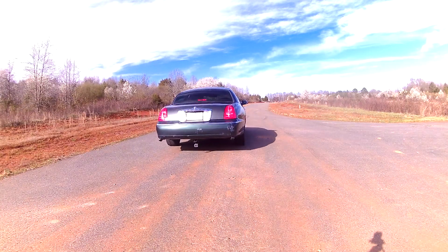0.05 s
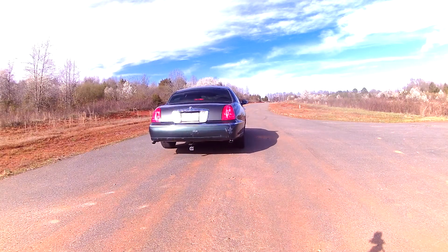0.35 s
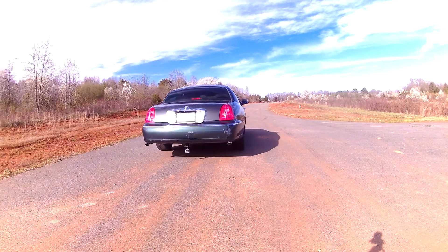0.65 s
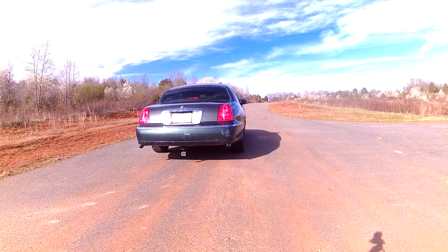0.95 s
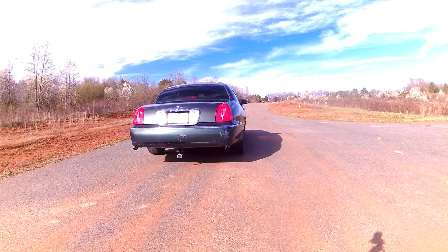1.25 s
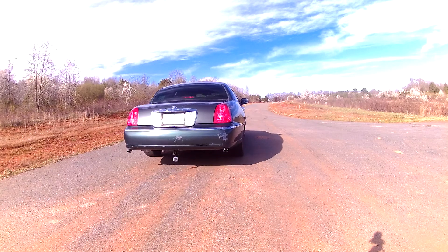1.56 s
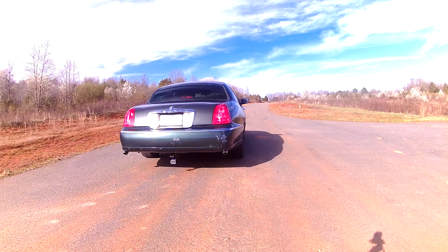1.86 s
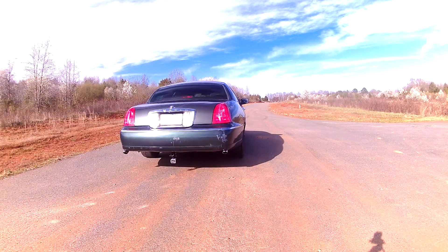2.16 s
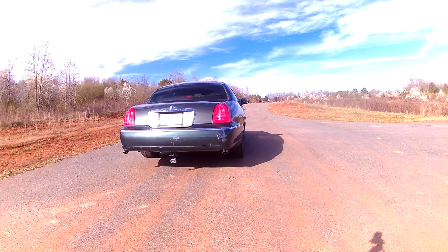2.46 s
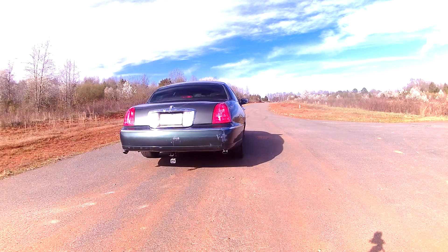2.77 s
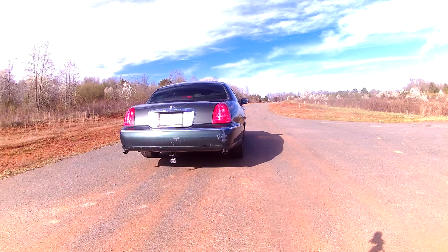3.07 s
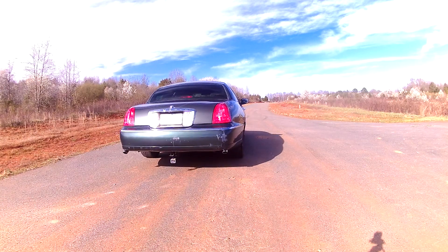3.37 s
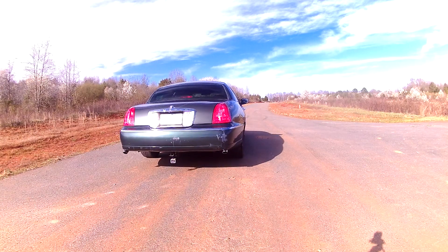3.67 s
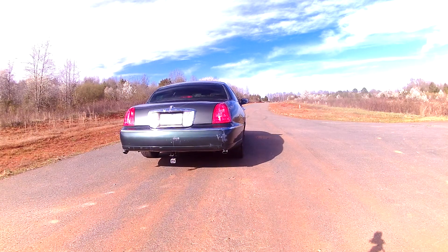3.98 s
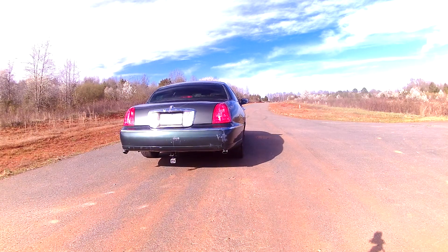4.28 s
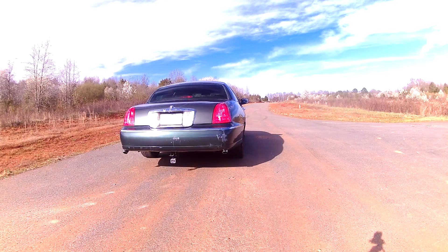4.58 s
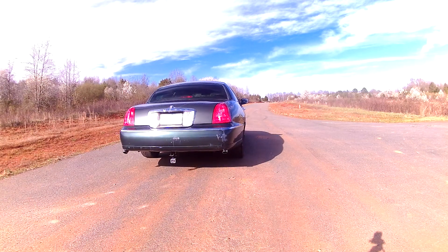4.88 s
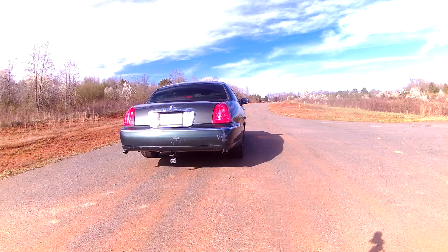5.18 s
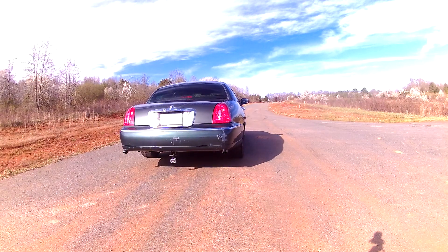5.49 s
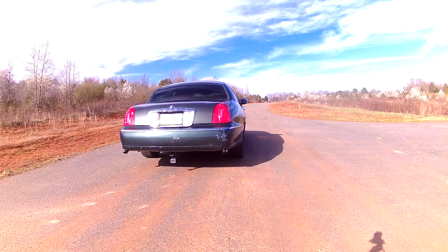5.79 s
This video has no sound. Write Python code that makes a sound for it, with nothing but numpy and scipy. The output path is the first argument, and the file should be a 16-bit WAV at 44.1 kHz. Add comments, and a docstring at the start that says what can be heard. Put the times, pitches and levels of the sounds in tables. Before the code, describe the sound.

A large V8 car reverses slowly toward the microphone on an open road, its tyres rustling and cracking a few small stones, with one brief squeak and a faint gear whine. It stops and idles with a deep, loping exhaust and light valve ticking. The gear selector clunks through its notches, the revs sag, and the driveline knocks once. A faint hiss sits underneath.

```python
"""V8 saloon reversing to a stop

A big V8 backs slowly up on an open road, tyres cracking grit, then idles; unequal exhaust pulses make it lope.
Valves tick, a gear whines faintly, a rub squeaks once. The selector clunks through its notches, the revs
sag as drive takes up, and the driveline knocks once. The camera adds hiss and a thin electric whistle."""
import sys
import numpy as np
from scipy import signal
from scipy.fft import rfft, irfft, next_fast_len
from scipy.io import wavfile
from scipy.ndimage import map_coordinates

SR = 44100
rng = np.random.default_rng(int(sys.argv[2]) if len(sys.argv) > 2 else 0)


def bounce(signal):
    """Save signal as a 16-bit WAV file at the path given by the first command-line argument."""
    frames = np.transpose(np.atleast_2d(signal))
    limited = np.clip(frames, -1, 1)
    pcm = np.round(limited * 32767).astype(np.int16)
    wavfile.write(sys.argv[1], SR, pcm)


N = 257103

# background hiss spectrum (frequency [Hz], level [dB])
HISS_SPECTRUM = [(20, 26), (200, 17.5), (1000, 9), (4500, 6.5), (7000, 3), (10000, 1), (15500, -1.5)]
# tread on gritty asphalt (frequency [Hz], level [dB])
TREAD_SPECTRUM = [(150, 3), (450, 7.5), (720, 1.5), (950, -4.5), (1250, 2), (1700, -1.5), (2200, -13.5),
                  (2900, -19.5), (3900, -19), (4600, -32), (7000, -34), (12000, -42)]
# stones cracking (time [s], snap [dB], tick [dB])
STONE_CRACKS = [(.594, -45.5, -72), (.652, -64, -56), (1.069, -53, -67), (1.191, -43.5, -60.5),
                (1.391, -45.5, -66), (1.753, -46, -62)]
# stone snap spectrum (frequency [Hz], level [dB])
SNAP_SPECTRUM = [(400, -8), (1000, 4.5), (1700, 14), (3300, 5.5), (5000, -15.5), (7000, -13), (12000, -29)]
# bright stone tick spectrum (frequency [Hz], level [dB])
TICK_SPECTRUM = [(1500, -24), (3800, 1.5), (6500, 0.5), (9000, -7), (14000, -18.5)]
# selector and driveline clunks (time [s], body [dB], knock [dB], rattle [dB], rise [s], t60 [s])
CLUNK_EVENTS = [(3.967, -43.5, -59, -56.5, 0.0065, 0.12), (4.193, -50, -39, -80, 0.0026, 0.17),
                (4.283, -34.5, -40.5, -59.5, 0.015, 0.19), (4.367, -48, -52, -62.5, 0.0032, 0.14),
                (4.39, -48, -43, -70.5, 0.0024, 0.1), (5.163, -56, -49, -78, 0.0027, 0.11),
                (5.736, -53.5, -44, -59.5, 0.014, 0.092)]
# underbody resonances (frequency [Hz], width [Hz], level [dB])
BODY_MODES = [(434, 59, 9.5), (610, 69, -9.5), (844, 34, -12.5), (1390, 250, -4.5), (1657, 87, -7),
              (1960, 210, -18), (2470, 160, -25)]
# linkage resonances (frequency [Hz], width [Hz], level [dB])
LINKAGE_MODES = [(523, 167, 1), (710, 133, 2.5), (876, 59, 2.5), (1320, 67, -10.5)]
# drive shaft resonances (frequency [Hz], width [Hz], level [dB])
SHAFT_MODES = [(855, 85, 4.5), (1190, 115, 3.5), (1615, 81, 7), (2490, 73, -7.5)]
# spells of louder gear whine (start [s], length [s], gain [dB])
GEAR_SWELLS = [(.25, .55, 6.5), (1.003, .24, 8), (2.178, .82, 5)]
# crankshaft speed (time [s], speed [rpm])
CRANK_SPEED = [(0.0, 878.8), (0.35, 846.4), (0.62, 849.0), (1.37, 782.4), (1.8, 781.7), (2.13, 742.4),
               (2.68, 743.0), (3.04, 727.8), (3.89, 715.8), (4.06, 720.4), (4.57, 771.4), (5.02, 635.4),
               (5.43, 650.0), (5.83, 707.4)]
# louder tappets (crank angle [deg], level [dB])
TAPPET_HITS = [(12, 2.5), (152, -8.5), (250, 2.5), (315, -8), (382, -2.5), (467, -1.5), (575, -1)]
# valve train and rattle spectrum (frequency [Hz], level [dB])
METAL_SPECTRUM = [(1200, -16.5), (2200, 3.5), (2900, -2.5), (3500, 3), (4100, 1), (4600, -16.5),
                  (6800, -13.5), (10000, -31)]
# valve train gain (idle [dB], revs [dB/doubling], drive [dB])
VALVE_GAIN = (-73, 14, 1.3)
# fan and belt spectrum (frequency [Hz], level [dB])
BAY_SPECTRUM = [(150, 4), (260, 5.5), (360, 7.5), (470, 4), (720, 1), (950, -8), (1200, -2.5), (1650, -5),
                (2100, -16.5), (2900, -25.5), (4500, -43)]
# fan and belt gain (idle [dB], revs [dB/doubling], drive [dB])
BAY_GAIN = (-47.5, 9.4, 1)
# hollow tailpipe barks, each cycle (crank angle [deg], level [dB], pitch [Hz], swell [s])
PIPE_BARKS = [(16, -1, 352, 0.0036), (75.5, -4.5, 475, .005), (148.5, 0.5, 310, 0.0029),
              (213.5, -2.5, 540, 0.005), (281.8, -5.5, 560, .007), (419.1, 0.5, 230, .005),
              (525, -8, 355, 0.013), (593, -1.5, 240, 0.0074), (645, -3.5, 390.6, 0.005),
              (668, -8.5, 490, 0.0026)]
# tailpipe rasp gain (idle [dB], revs [dB/doubling], drive [dB])
RASP_GAIN = (-49, 20, 0.8)
# each cylinder's pulse leaving the pipe (crank angle [deg])
PULSE_ANGLES = [42.3, 136.1, 222.5, 315.5, 403.5, 491, 583.9, 671.8]
# manifold route per cylinder, same order (boom [dB], throb [dB], drone [dB], edge [dB])
MANIFOLD_ROUTES = [(-4, -0.3, -1.5, -11), (-1, -4.5, 2, 9), (0.2, -1.7, 1, 1), (-0.5, -0.1, 0.5, 8.5),
                   (1, 1, 3, -7), (1.9, -5, -8, 5.5), (-1.5, -6.5, 2.5, 8), (-0.9, 0.3, 0.3, -10.5)]
# boom, throb, drone and edge bands (frequency [Hz])
ROUTE_BANDS = [60, 100, 150, 230]
# silencer and tailpipe response (frequency [Hz], gain [dB])
PIPE_RESPONSE = [(15, 7), (36, 15), (50, 28.5), (66, 21.5), (88, 26.5), (102, 24), (116, 26.5), (126, 24),
                 (149, 29), (170, 13), (200, 6), (260, -7.5), (500, -27.5), (3000, -74)]
# silencer resonance under load (frequency [Hz], width [Hz], level [dB])
LOAD_MODES = [(83.8, 34, -1)]
# exhaust boom gain (idle [dB], revs [dB/doubling], drive [dB])
BOOM_GAIN = (-0.5, 14.8, 1.0)

DRIVE_AT_S, TAKE_UP_S = 4.7, 0.72


def amp(db):
    return 10 ** (np.asarray(db) / 20)


def unit(x):
    return x / np.sqrt(np.mean(x ** 2) + 1e-20)


def ramp(start_s, length_s):
    """Linear rise from 0 to 1."""
    return np.clip((np.arange(N) / SR - start_s) / length_s, 0, 1)


def burst(start_s, rise_s, t60_s):
    """Linear rise, exponential decay."""
    t = np.arange(N) / SR - start_s
    return ramp(start_s, rise_s) * amp(-60 * np.maximum(t - rise_s, 0) / t60_s)


def wobble(rate_hz):
    """Smooth random curve."""
    knots = rng.standard_normal(int(N * rate_hz / SR) + 4)
    return map_coordinates(knots, [np.arange(N) * rate_hz / SR])


def coloured(x, points, size=65536):
    """Minimum-phase filter through (frequency [Hz], gain [dB]) points."""
    hz, db = np.transpose(points)
    gain = amp(np.interp(np.log(np.fft.rfftfreq(size, 1 / SR) + 1), np.log(hz), db))
    cepstrum = irfft(np.log(gain))
    cepstrum[1:size // 2] *= 2
    cepstrum[size // 2 + 1:] = 0
    impulse_response = irfft(np.exp(rfft(cepstrum)))[:size // 2]
    return signal.fftconvolve(x, impulse_response)[:N]


def resonate(x, modes):
    """Parallel resonances of alternating sign (frequency [Hz], width [Hz], level [dB])."""
    size = next_fast_len(N + SR // 2)
    f = np.fft.rfftfreq(size, 1 / SR)
    response = sum((-1) ** k * amp(db) * 1j * f * width / (hz * hz - f * f + 1j * f * width)
                   for k, (hz, width, db) in enumerate(modes))
    return irfft(rfft(x, size) * response, size)[:N]


def noise(spectrum):
    """Coloured noise, rms 1."""
    return unit(coloured(rng.standard_normal(N), spectrum))


def ringing(modes, tilt):
    """Resonant noise, rms 1."""
    return unit(coloured(resonate(rng.standard_normal(N), modes), tilt))


def strokes(turns, angle_deg, db, scatter_db):
    """One impulse every two crank turns."""
    at = np.searchsorted(turns, np.arange(angle_deg / 360, turns[-1], 2))
    return np.bincount(at, amp(db + scatter_db * rng.standard_normal(len(at))), N)


def puffs(impulses, rise_s):
    """A short swell per impulse."""
    u = np.arange(SR // 10) / SR / rise_s
    return signal.fftconvolve(impulses, u * np.exp(1 - u))[:N]


def reversing(speed_m_s=1.56, brake_at_s=0.99, braking_s=1, stop_m=3.9):
    """Even braking: pace (1 rolling, 0 stopped) and 1/distance gain (1 at the stop)."""
    roll = 1 - ramp(brake_at_s, braking_s)
    travelled_m = speed_m_s * np.cumsum(roll) / SR
    return roll, stop_m / (stop_m + travelled_m[-1] - travelled_m)


def effort(rpm, gains, idle_rpm=750):
    """Gain of an engine part, rising with revs and drive load."""
    idle_db, revs_db, drive_db = gains
    return amp(idle_db + revs_db * np.log2(rpm / idle_rpm) + drive_db * ramp(DRIVE_AT_S, TAKE_UP_S))


def camera(hiss_db=-69, whistle_db=-80, whistle_hz=9096.1, buzz_hz=38.55):
    """Open air, camera hiss and a whistle that buzzes as its phase flips."""
    t = np.arange(N) / SR
    polarity = np.tanh(12 * np.sin(2 * np.pi * buzz_hz * t))
    whistle = unit(np.sin(2 * np.pi * whistle_hz * t) * polarity)
    return amp(whistle_db) * whistle + amp(hiss_db) * noise(HISS_SPECTRUM)


def tyres(roll, tread_db=-48, uneven_db=1.7):
    """Tread rustles on the road in proportion to pace."""
    return roll * amp(tread_db + uneven_db * wobble(12.18)) * noise(TREAD_SPECTRUM)


def grit(roll, grains_per_s=60, crunch_db=-62, spread_db=3.0):
    """Stones snap under the tyres; fine grains crunch while they roll."""
    snap, tick = noise(SNAP_SPECTRUM), noise(TICK_SPECTRUM)
    stones = sum(burst(at_s, rise_s=0.00026, t60_s=0.012) * (amp(snap_db) * snap + amp(tick_db) * tick)
                 for at_s, snap_db, tick_db in STONE_CRACKS)
    hits = rng.random(N) < roll * grains_per_s / SR
    grains = hits * amp(crunch_db + spread_db * rng.standard_normal(N))
    return stones + puffs(grains, rise_s=0.0011) * snap


def clunks(jolt_db=-29, jolt_hz=31, shaft_db=-40):
    """Linkage knocks, shakes the underbody and rattles; the last clunk rings the shaft, rocks the car."""
    body = ringing(BODY_MODES, tilt=[(150, -13.5), (400, 4), (2500, 5), (5000, -11.0)])
    knock, shaft = (ringing(m, tilt=[(2500, 5.5), (5000, -31)]) for m in (LINKAGE_MODES, SHAFT_MODES))
    rattle = noise(METAL_SPECTRUM)
    out = np.zeros(N)
    for at_s, body_db, knock_db, rattle_db, rise_s, t60_s in CLUNK_EVENTS:
        blend = amp(body_db) * body + amp(knock_db) * knock + amp(rattle_db) * rattle
        out += burst(at_s, rise_s, t60_s) * blend
    last_s = CLUNK_EVENTS[-1][0]
    jolt = amp(jolt_db) * np.sin(2 * np.pi * jolt_hz * (np.arange(N) / SR - last_s))
    return out + burst(last_s, rise_s=0.016, t60_s=0.16) * (jolt + amp(shaft_db) * shaft)


def rub(roll, hz=1182, width_hz=45, rest_db=-69.5, roll_db=10, squeak_db=-43.5):
    """Light rub at a steady pitch, louder when rolling; catches once in a squeak."""
    mode = [(hz, width_hz, 0)]
    tone = unit(resonate(resonate(rng.standard_normal(N), mode), mode))
    squeak = amp(squeak_db) * burst(start_s=0.52, rise_s=0.0062, t60_s=0.22)
    return tone * (amp(rest_db + roll_db * roll) + squeak)


def gear_whine(turns, roll, teeth=74, rest_db=-69.5, roll_db=6, waver_db=3.5, edge_s=0.07):
    """Gear mesh sings in step with the crank, louder when rolling and in spells."""
    mesh = np.sqrt(2) * np.sin(2 * np.pi * teeth * turns + 0.8 * wobble(40))
    swell_db = sum(db * (ramp(start_s, edge_s) - ramp(start_s + length_s, edge_s))
                   for start_s, length_s, db in GEAR_SWELLS)
    return mesh * amp(rest_db + roll_db * roll + swell_db + waver_db * wobble(14))


def valve_train(turns, tick_depth=0.96):
    """Tappets tick over a steady mechanical hiss."""
    taps = sum(strokes(turns, angle_deg, db, scatter_db=1.5) for angle_deg, db in TAPPET_HITS)
    envelope = 1 + tick_depth * puffs(taps, rise_s=0.002)
    return unit(coloured(rng.standard_normal(N) * envelope, METAL_SPECTRUM))


def engine_bay(turns, flutter_db=1.08, throb_db=0.1):
    """Fan and belts rush, throbbing slightly at four firings a turn."""
    throb = np.cos(2 * np.pi * 4 * turns)
    return noise(BAY_SPECTRUM) * amp(flutter_db * wobble(25) + throb_db * throb)


def rasp(turns, roughness=0.4):
    """Short tailpipe rings, part clean tone, part turbulent gas."""
    out, t = np.zeros(N), np.arange(SR // 10) / SR
    for angle_deg, db, hz, swell_s in PIPE_BARKS:
        kicks = strokes(turns, angle_deg, 0, scatter_db=0.8)
        gas = unit(puffs(kicks, rise_s=0.0035) * rng.standard_normal(N))
        ring = t * np.exp(-t / swell_s) * np.sin(2 * np.pi * hz * t)
        out += amp(db) * unit(signal.fftconvolve(unit(kicks) + roughness * gas, ring)[:N])
    return unit(out)


def exhaust(turns, strength, dip_db=-8.5, gap_depth=0.91, gap_deg=100, gap_sharpness=8.2):
    """Eight unequal pulses a cycle, each coloured by its manifold route, boom through the pipe."""
    pulses = sum(coloured(strokes(turns, angle_deg, 0, scatter_db=0.9), list(zip(ROUTE_BANDS, route)))
                 for angle_deg, route in zip(PULSE_ANGLES, MANIFOLD_ROUTES))
    dip = amp(dip_db * ramp(start_s=5.77, length_s=0.06))  # just after the last knock
    boom = coloured(pulses * strength * dip, PIPE_RESPONSE)
    boom += ramp(DRIVE_AT_S, TAKE_UP_S) * resonate(boom, LOAD_MODES)
    # once a cycle the two banks oppose and the drone drops out
    drone = resonate(boom, [(149, 57, 0.012)])
    gap = np.exp(gap_sharpness * (np.cos(np.pi * turns - np.radians(gap_deg) / 2) - 1))
    return boom - gap_depth * (gap - gap.mean()) * drone


def scene():
    """Mono mix; exhaust, engine and whines grow as the car nears."""
    rpm = np.interp(np.arange(N) / SR, *np.transpose(CRANK_SPEED))
    turns = np.cumsum(rpm) / 60 / SR
    roll, near = reversing()
    pipe = exhaust(turns, effort(rpm, BOOM_GAIN)) + effort(rpm, RASP_GAIN) * rasp(turns)
    engine = effort(rpm, BAY_GAIN) * engine_bay(turns) + effort(rpm, VALVE_GAIN) * valve_train(turns)
    whines = gear_whine(turns, roll) + rub(roll)
    return (near * (pipe + engine + whines) + tyres(roll) + grit(roll) + clunks() + camera())[None]


def record(dry, low_hz=14, top_hz=15720):
    """Camera passband: deepest rumble rolled off, hard cut at the top."""
    size = next_fast_len(N + SR // 2)
    f = np.fft.rfftfreq(size, 1 / SR)
    passband = f ** 4 / (f ** 4 + low_hz ** 4) * (f < top_hz)
    return irfft(rfft(dry, size) * passband, size)[..., :N]


dry = scene()
out = record(dry)
bounce(out)
```